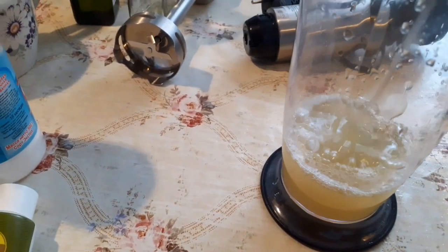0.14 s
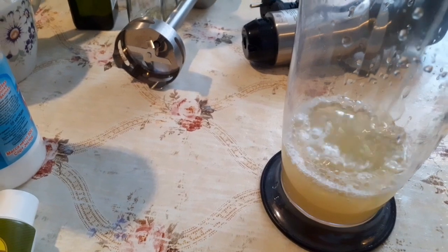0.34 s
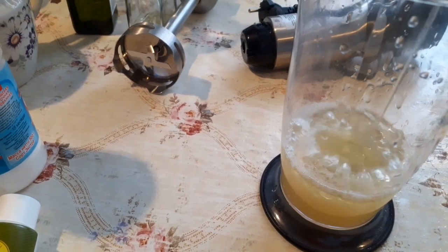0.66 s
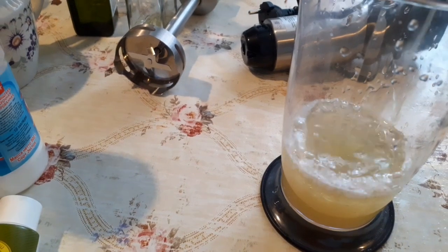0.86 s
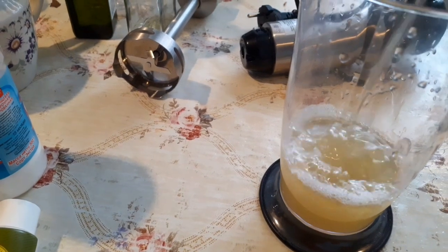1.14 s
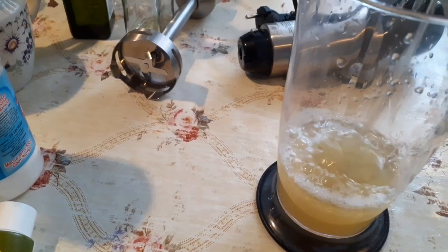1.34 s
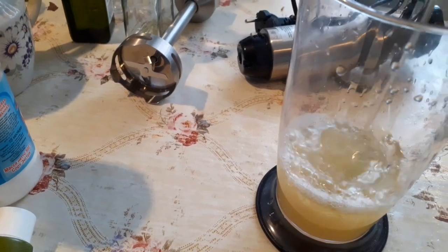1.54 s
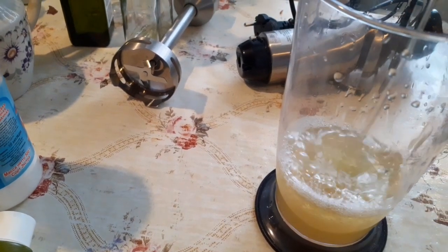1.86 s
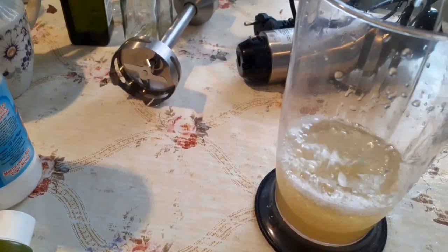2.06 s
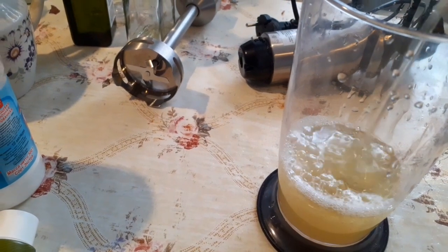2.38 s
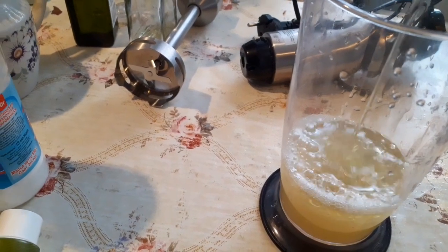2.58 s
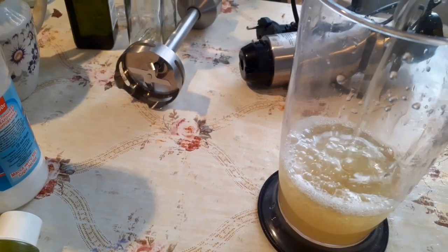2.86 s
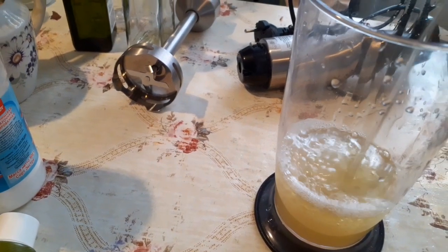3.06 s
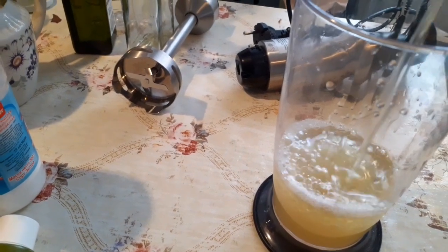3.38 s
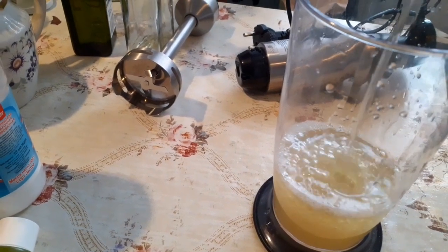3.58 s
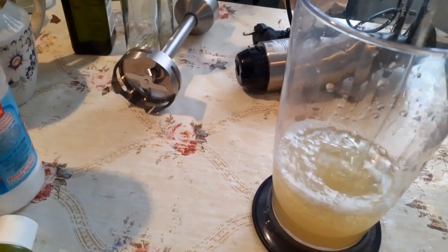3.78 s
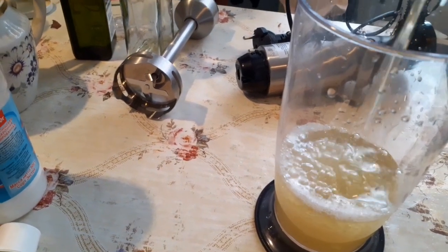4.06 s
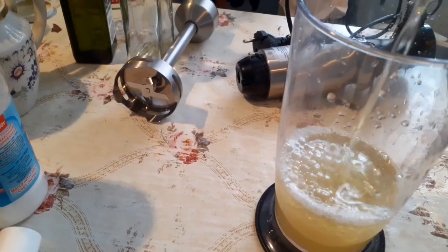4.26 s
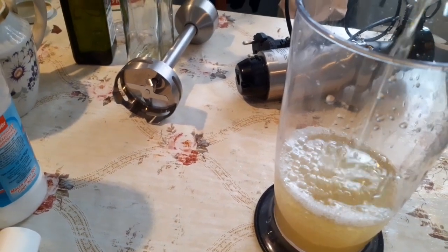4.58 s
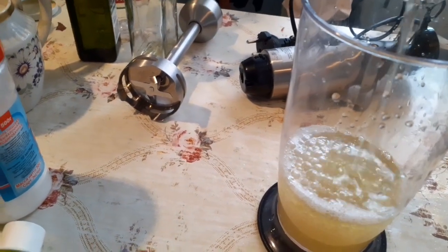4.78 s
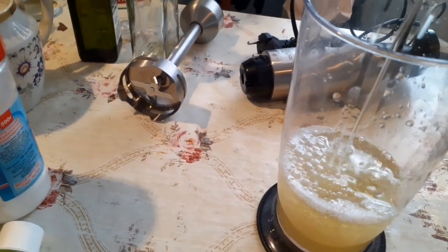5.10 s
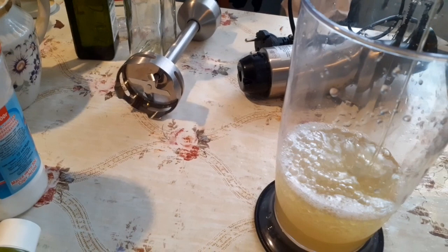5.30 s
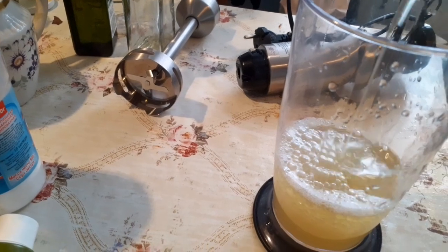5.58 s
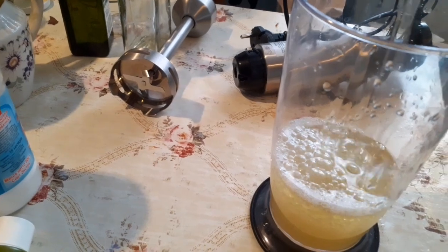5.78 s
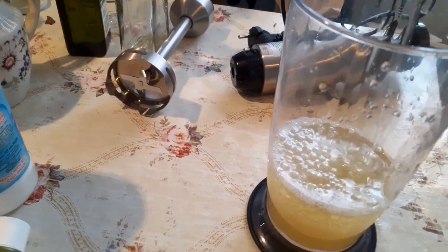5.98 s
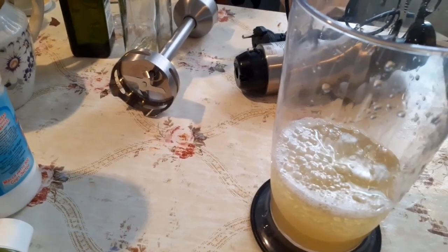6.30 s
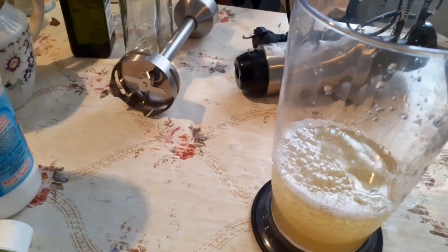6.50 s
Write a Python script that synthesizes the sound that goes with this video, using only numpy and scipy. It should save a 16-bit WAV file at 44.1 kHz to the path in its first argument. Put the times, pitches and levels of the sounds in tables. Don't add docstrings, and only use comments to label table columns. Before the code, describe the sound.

Oil glugs quickly from a bottle into a tall plastic beaker, hollow thumps and splashes thinning into scattered bubble plinks over a faint kitchen hum.

```python
import sys
import numpy as np
from scipy import signal
from scipy.fft import rfft, irfft, next_fast_len
from scipy.io import wavfile
from scipy.ndimage import uniform_filter1d

SR = 44100
rng = np.random.default_rng(int(sys.argv[2]) if len(sys.argv) > 2 else 0)


def bounce(signal):
    frames = np.transpose(np.atleast_2d(signal))
    limited = np.clip(frames, -1, 1)
    pcm = np.round(limited * 32767).astype(np.int16)
    wavfile.write(sys.argv[1], SR, pcm)


def elevation(decibels):
    levels = np.asarray(decibels, float)
    return 10 ** (levels / 20)


N = 292824
TIME_S = np.arange(N) / SR
NEAR_DB = 6


def colour(x, points):
    hz, db = np.transpose(points)
    size = next_fast_len(len(x))
    bin_hz = np.arange(size // 2 + 1) * SR / size + 1
    gain = elevation(np.interp(np.log(bin_hz), np.log(hz), db))
    return irfft(rfft(x, size) * gain, size)[:len(x)]


def level(x, db):
    return x * elevation(db) / np.sqrt(np.mean(x ** 2))


def noise(points, db):
    return level(colour(rng.standard_normal(N), points), db)


def walk(rate_hz):
    hold = int(SR / rate_hz)
    steps = np.repeat(rng.standard_normal(N // hold + 1), hold)
    return 0.91 * uniform_filter1d(steps, hold)[:N]


def add(out, s, grain):
    i = int(s * SR)
    out[i:i + len(grain)] += grain[:N - i]


def ring(hz, db, t60_s, rise_s, glide=0.):
    t = np.arange(int(t60_s * SR)) / SR
    envelope = elevation(db - 60 * t / t60_s) * (1 - np.exp(-t / rise_s))
    return envelope * np.sin(2 * np.pi * hz * t * (1 + glide * t / t60_s))


def swarm(out, s, hz, db, count, spread, within_s, cycles):
    for detune, lag, size in rng.standard_normal((count, 3)):
        f = np.clip(hz * np.exp(spread * detune), 500, 15000)
        size_db = db + 2.2 * size - 4 * lag ** 2
        add(out, s + within_s * lag ** 2, ring(f, size_db, cycles / f, 2 / f, glide=0.14))


# (frequency [Hz], t60 [s], level [dB])
ROOM = [(153, 0.68, -37), (349, 0.52, -3), (620, 0.23, -0.5), (1000, 0.2, 0), (1850, 0.18, -1),
        (5340, 0.22, -4.5), (12900, 0.17, 0.5)]


def kitchen(x):
    places, shifts_hz = 3, 11
    hz, t60_s, db = np.transpose(ROOM)
    t, tails = TIME_S[:SR // 2], 0
    for centre in 60 * 2 ** np.arange(0, 8.1, .5):
        at = np.log(centre), np.log(hz)
        bandpass = [(centre / 2, -60), (centre / 2 ** .5, -15), (centre, 0),
                    (centre * 2 ** .5, -15), (centre * 2, -60)]
        band = colour(rng.standard_normal(places * len(t)), bandpass).reshape(places, -1)
        fade = elevation(-60 * t / np.interp(*at, t60_s)) * (t > .004)
        tails = tails + band * fade * elevation(np.interp(*at, db)) / np.sqrt(np.sum(fade ** 2))
    share = np.array([walk(shifts_hz) for _ in range(places)])
    share /= np.sqrt(np.sum(share ** 2, axis=0))
    return x + signal.oaconvolve(x * share, tails, axes=1).sum(axis=0)[:N]


# (time [s], level [dB])
CHURN = [(0, -58), (1.1, -46), (2.75, -48.5), (2.9, -42), (3.25, -51.5), (4, -47.5), (4.3, -54),
         (4.7, -41.5), (5.24, -50.5), (5.31, -48.5), (5.4, -55.5), (5.95, -46), (6.07, -50.5), (6.19, -46),
         (6.3, -48.5), (6.52, -62), (6.58, -44.5), (6.64, -46.5)]
# (frequency [Hz], density [dB per Hz])
RUMBLE = [(24, -54), (40, -55), (123, -7), (157, -12.5), (179, -0.5), (216, -5), (235, -1.5), (341, 1),
          (558, -31), (700, -89)]


def rumble():
    lumps = elevation(2.84 * walk(30)) * rng.standard_normal(N)
    churn_db = np.interp(TIME_S, *np.transpose(CHURN))
    return level(colour(lumps, RUMBLE), 0) * elevation(churn_db)


# (time [s], level [dB])
FOAM = [(0, -66.5), (1.2, -60.5), (2.2, -66.5), (2.6, -60), (2.95, -58.5), (3.2, -64.5), (3.6, -56.5),
        (4.25, -65), (4.6, -56), (4.8, -66), (5.0, -53.5), (5.25, -66), (5.8, -68), (6.64, -71.5)]
# (frequency [Hz], level [dB])
FIZZ = [(400, -9), (600, 0.5), (900, 1), (1300, -4), (1750, 12), (2600, 2), (4500, 7), (9000, 2.5),
        (16000, 1.5)]


def fizz():
    chatter = 0.19 * rng.standard_normal(N)
    for when, pitch, size in rng.random((2600, 3)):
        hz = 450 * 12 ** pitch
        add(chatter, when * N / SR, ring(hz, 11 * size ** 3, 22 / hz, 0.0011, glide=0.17))
    foam_db = np.interp(TIME_S, *np.transpose(FOAM))
    return level(colour(chatter, FIZZ), 0) * elevation(foam_db)


# (time [s], thump [dB], bubble [Hz], bubble re thump [dB], deep modes re thump [dB])
GULPS = [(0.001, -27.5, 860, -42, -0.5), (0.177, -18, 578, -1, -1), (0.358, -27, 710, -14, 0.5),
         (0.532, -22.5, 680, -1.5, 2), (0.703, -28.5, 734, -7.5, 4.5), (0.878, -19.5, 597.4, 5, -2.5),
         (1.055, -29.5, 694, -7, -9), (1.224, -26.5, 806, -6, -3), (1.4, -25, 754, -10.5, -1.5),
         (1.564, -27, 616, -6, 4), (1.734, -19.5, 639, -3.5, -4.5), (1.904, -19.5, 639, 0.5, -8),
         (2.076, -14, 540, -0.5, 0), (2.245, -29, 612, 3.5, 3), (2.42, -26.5, 670, -3, 0),
         (2.598, -34.5, 642, 7.5, 13.5), (2.777, -25.5, 610, -1, -2), (2.964, -40.5, 695, 5, 1),
         (3.127, -27.5, 533, 1.5, 0), (3.3, -34.5, 545, 3.5, 3.5), (3.48, -28.5, 622, 1, -6.5),
         (3.652, -34.5, 645, 6, -3.5), (3.826, -24, 759, -3, -1.5), (4.001, -26.5, 650, -0.5, 1),
         (4.174, -29.5, 735, 4, -1), (4.355, -35.5, 827, -9.5, -9), (4.53, -42, 563, -25, 7.5),
         (4.856, -34, 836, -10, -3)]
# (frequency [Hz], level [dB], t60 [s])
BODY = [(109, -11.5, 0.3), (141.7, -2.5, 0.33), (198.2, -0.5, 0.3), (251.8, 4.5, 0.27), (309.7, 2.5, 0.17),
        (335, -0.5, 0.14), (361, -27, 0.2)]
# (frequency [Hz], level re thump [dB], t60 [s])
NECK = [(1152.5, -16, 0.13), (836, -20, 0.2)]
NECK_RINGS_DB = [0, 0.5, -6, -2.5, -4, -3, -3, 5, 4, -1.5, 8, 8.5, 1.5, -7, 5, -3.5]


def gulps():
    out = np.zeros(N)
    necks_db = NECK_RINGS_DB + NECK_RINGS_DB[-1:] * len(GULPS)
    for (s, db, hz, bubble_re_db, deep_db), neck_db in zip(GULPS, necks_db):
        s += .002
        for f, mode_db, t60_s in BODY:
            size, detune = rng.standard_normal(2)
            mode_db = db + mode_db - 7 + 2 * size + (f < 170) * deep_db
            add(out, s, ring(f * (1 + 0.036 * detune), mode_db, 0.91 * t60_s, 0.0021))
        add(out, s, ring(371, db - 3, 0.02, 0.00053))
        bubble_db = db + bubble_re_db
        add(out, s, ring(hz, bubble_db, 0.089, 0.00059, glide=0.051))
        pair_hz = hz * (1 + 0.1 * np.tanh(rng.standard_normal()))
        add(out, s, ring(pair_hz, bubble_db - 5, 0.076, 0.006, glide=-0.054))
        for f, mode_db, t60_s in NECK:
            size, detune = rng.standard_normal(2)
            mode_db = db + mode_db + neck_db + 0.87 * size - 3.5 * s
            add(out, s, ring(f * (1 + 0.0193 * detune), mode_db, t60_s, 0.00015, glide=0.013))
        swarm(out, s, hz, bubble_db - 13, count=4, spread=.3, within_s=.012, cycles=14)
    return out


# (time [s], spray [dB], spray [Hz], top re spray [dB], slap [dB])
SPLASHES = [(0.002, -33, 5450, -5, -28), (0.176, -52, 7600, 14.5, -31.5), (0.357, -38.5, 4310, -9, -34),
            (0.5345, -41.5, 6700, 1, -30.5), (0.7081, -39.5, 4560, -6, -27.5),
            (0.878, -41, 6500, -33, -24.5), (1.057, -28.5, 6120, -7.5, -32.5),
            (1.2268, -29.5, 5580, -13, -25.5), (1.4, -27.5, 6340, -5.5, -22),
            (1.567, -22.5, 6540, -7.5, -27), (1.7387, -39, 4700, 1, -18.5), (1.907, -27.5, 7180, -6, -19),
            (2.0778, -31, 6770, -1.5, -26.5), (2.2474, -39.5, 4440, 1, -30),
            (2.425, -34.5, 7800, -8, -29.5), (2.601, -34, 7640, 0, -26.5), (3.303, -53, 7200, -23, -36),
            (3.669, -23.5, 5620, -12, -29), (3.829, -41, 6500, -16, -45), (4.0078, -46, 6960, -15, -36),
            (4.1728, -47, 6660, -2, -34.5), (4.358, -48, 7160, -20, -37.5), (4.532, -35, 5260, -5, -45),
            (4.863, -31, 6200, -22, -32.5)]


def slaps():
    out, t = np.zeros(N), TIME_S[:6000]
    for s, *_, db in SPLASHES:
        add(out, s, elevation(db - 60 * t / 0.16) * (1 - np.exp(-t / 0.00093)))
    return out * noise([(600, 13), (900, 15), (2000, 6.5), (3500, 5.5), (16000, -13.5)], -14)


def drops():
    out = np.zeros(N)
    for s, *_, slap_db in SPLASHES:
        swarm(out, s, 3110, slap_db + 1, count=20, spread=0.59, within_s=0.029, cycles=8.1)
    return out


def high_air():
    return noise([(6000, -39), (9000, -16), (11000, -5.5), (13000, 2), (16000, -1.5)], 0.55)


# (time [s], level [dB], frequency [Hz], top re peak [dB])
BURSTS = [(0.013, -37.5, 6200, 4), (0.4955, -44, 6700, -58), (0.739, -44, 4400, -25),
          (0.991, -35.5, 6230, -33), (1.163, -40.5, 5740, -35), (2.32, -47, 4250, -26),
          (2.3788, -42, 5340, -29), (2.715, -35.5, 6120, -12), (2.7796, -47, 6900, -9),
          (2.819, -46.5, 4350, -6), (3.025, -37.5, 4380, -13), (3.3535, -39, 5220, -9),
          (3.4158, -43.5, 6500, -11), (3.479, -38, 3930, -16), (3.5643, -43.5, 4440, -25),
          (3.8475, -28, 4900, -13), (3.931, -43.5, 6700, -25), (4.031, -33, 5920, -14),
          (4.127, -40, 6200, -1), (4.4357, -41.5, 8120, -3), (4.4856, -31, 6400, -8),
          (4.6204, -34, 5570, -10), (4.802, -42, 6100, -5), (4.9377, -41, 5340, -10),
          (4.968, -39.5, 6400, -6), (5.1397, -35.5, 5440, -6), (5.3004, -44.5, 3950, -20),
          (5.469, -37, 5700, -49), (5.9089, -41.5, 5840, -4)]
# (time [s], level [dB], frequency [Hz], top re peak [dB])
SPITS = [(2.426, -31.5, 11300, -20), (2.44, -40, 11000, -20), (2.615, -45, 13500, -10),
         (2.852, -48, 6800, -12), (3.612, -53, 6100, -13), (4.352, -55, 5200, -20), (4.685, -53, 5300, -20),
         (4.855, -37.5, 4770, -17), (4.928, -44, 5500, -20), (5.056, -49, 5200, -15),
         (5.15, -48, 4900, -25), (5.175, -41, 4270, -25), (3.869, -43, 3100, -23), (1.75, -34, 2440, -30)]


def bursts():
    out, puffs = np.zeros(N), np.zeros(N)
    t = TIME_S[:6000]
    puff = np.minimum(t / .001, 1) * (elevation(-60 * t / .009) + elevation(-22 - 60 * t / .13))
    sprays = [row[:4] for row in SPLASHES]
    for s, db, hz, top_db in BURSTS + sprays + SPITS:
        add(out, s, ring(hz, db - 5, .006, .0005))
        swarm(out, s, hz, db - 1.5, count=24, spread=0.14, within_s=0.0043, cycles=42.6)
        add(puffs, s, elevation(db + top_db) * puff)
    return out + puffs * high_air()


# (time [s], level [dB], frequency [Hz])
BUBBLES = [(0.0133, -20, 1500), (0.3632, -25, 1500), (0.546, -27, 1090), (0.7035, -36, 1370),
           (0.7124, -15, 1588), (0.917, -33, 1140), (1.244, -40, 1240), (2.5055, -16, 1606),
           (2.551, -26, 1460), (2.603, -29.5, 1214), (2.646, -32, 1036), (3.6499, -31, 1000),
           (3.668, -26.5, 642), (3.69, -32, 933), (4.025, -23, 645), (3.8262, -23.5, 966),
           (3.9009, -23.5, 1500), (4.001, -32, 1510), (4.0302, -13.5, 1500), (4.0327, -21, 1750),
           (4.1762, -21.5, 1530), (4.3582, -29.5, 1110), (4.6057, -18.5, 1636), (4.6387, -32, 1390),
           (4.682, -19.5, 1474), (4.865, -34.5, 1350), (4.968, -16.5, 1578), (5.013, -32, 740),
           (5.055, -43, 718), (5.338, -28, 1515), (5.486, -40, 900),
           (1.0803, -32.5, 1680), (1.1586, -32, 2470), (1.226, -25.5, 1730), (1.615, -32, 1770),
          (1.616, -29.5, 2390), (2.322, -19, 2080), (2.399, -38, 1525), (2.603, -26, 2480),
          (2.6498, -19.5, 2415), (3.137, -23, 2104), (3.324, -19.5, 1703), (3.3507, -38, 2300),
          (3.3525, -8.5, 2210), (3.485, -15, 1940), (3.5266, -23, 1856), (3.528, -29.5, 2350),
          (3.6694, -21, 2170), (3.691, -13.5, 2120), (3.744, -27, 1700), (3.8294, -23.5, 2213),
          (3.8468, -21, 1720), (4.087, -35, 2420), (4.1082, -27.5, 1650), (4.5841, -25, 1760),
          (4.745, -36.5, 2430), (4.9674, -26.5, 2480), (5.1362, -27.5, 2150), (5.298, -35, 2420),
          (5.7053, -32.5, 1820), (5.7198, -27, 1924),
           (0.014, -15, 3030), (0.5915, -34, 3450), (0.7088, -28, 3870), (0.7275, -26.5, 2920),
         (0.981, -39, 3030), (0.9904, -37.5, 3670), (1.229, -21, 3440), (1.926, -31, 3050),
         (2.3438, -27, 2950), (2.378, -27.5, 3210), (2.5502, -30.5, 2600), (2.7103, -26, 3040),
         (2.738, -23, 2920), (2.782, -24, 2850), (3.0253, -28, 3370), (3.07, -32.5, 3660),
         (3.318, -18, 3140), (3.482, -30, 4080), (4.029, -34, 3390), (4.129, -34.5, 3200),
         (4.292, -37.5, 3050), (4.605, -35, 3460), (4.6203, -14, 3335), (4.8637, -21.5, 3144),
         (4.9376, -24, 3410), (5.1323, -15, 3800), (5.47, -38.5, 4150), (5.687, -38, 3120),
         (5.913, -36.5, 4010), (6.015, -39.5, 3110), (6.107, -41.5, 3440),
           (0.149, -44, 4180), (.238, -45, 2870), (.312, -49, 4200), (0.478, -44, 3320), (0.593, -30.5, 2620),
        (0.591, -32, 3910), (0.837, -47, 4830), (1.242, -26.5, 1960), (1.332, -39.5, 2700),
        (1.421, -30.5, 3380), (2.277, -39, 2450), (2.323, -28.5, 2510), (2.325, -28, 1760),
        (2.399, -31, 2410), (2.496, -37, 2990), (2.553, -47, 2960), (2.651, -33, 1330), (2.651, -32, 1780),
        (2.79, -33.5, 1080), (2.945, -37.5, 1098), (2.982, -32, 1670), (3.05, -34.5, 2190),
        (3.238, -40.5, 2200), (3.692, -19.5, 1716), (3.746, -40, 2050), (4.112, -46, 2000),
        (4.439, -42, 1900), (4.485, -41, 2190), (4.534, -41.5, 1170), (4.54, -38, 1630), (4.569, -31, 1540),
        (4.626, -24.5, 2300), (4.648, -38, 3260), (4.868, -30, 2090), (4.941, -31, 2470),
        (5.057, -40.5, 1000), (5.136, -37.5, 814), (5.369, -43, 1500), (5.618, -47.5, 4000),
        (5.71, -47, 1193), (5.745, -39, 1850), (5.775, -36, 1850), (5.823, -41, 2000), (5.91, -40.5, 2570),
        (6.016, -46, 2520), (6.04, -47, 1970)]


def plinks():
    out = np.zeros(N)
    trapped = [(s, slap_db - 8, 2850 * np.exp(0.082 * rng.standard_normal()))
               for s, *_, slap_db in SPLASHES]
    for s, db, hz in trapped + BUBBLES:
        if hz < 2230:
            add(out, s, ring(hz, db - 4.5, 48 / hz, 0.0011, glide=0.011))
            pair_hz = hz * (1 + 0.074 * np.tanh(3 * rng.standard_normal()))
            add(out, s, ring(pair_hz, db - 13.5, 40 / hz, 0.0026))
            swarm(out, s, hz, db - 11, count=7, spread=.055, within_s=.016, cycles=30)
        else:
            add(out, s, ring(hz, db - 1.5, 0.02, 0.001, glide=0.016))
            swarm(out, s, hz, db - 13, count=9, spread=.06, within_s=.008, cycles=30)
    return out


# (time [s], level [dB], frequency [Hz])
GURGLES = [(0.005, -35, 1760), (0.36, -45, 1820), (3.14, -44, 1890), (3.34, -37, 1640), (3.49, -36, 1810),
           (3.54, -39.5, 2100), (3.7, -35.5, 1770), (3.829, -36, 1400), (4.041, -33, 1850),
           (4.18, -37, 1200), (4.19, -42, 1700), (4.358, -41.5, 1520), (4.599, -41, 3000), (4.87, -47, 960),
           (4.97, -39, 2980), (5.14, -37.5, 2350)]


def gurgles():
    out = np.zeros(N)
    for s, db, hz in GURGLES:
        swarm(out, s, hz, db, count=24, spread=0.096, within_s=0.032, cycles=20.5)
    return out


# (time [s], start [Hz], end [Hz], length [s], level [dB], levelling off [exponent])
SQUEAKS = [(0.533, 1272, 2330, 0.025, -36.5, 1.2), (0.71, 1502, 4770, 0.032, -31, 1),
           (1.068, 1184, 1790, 0.024, -39.5, 3.1), (1.077, 2450, 3130, 0.025, -46, 1.8),
           (1.234, 940, 1520, 0.02, -34.5, 1), (1.24, 1090, 2406, 0.048, -40, 2.63),
           (2.102, 1174, 1920, 0.034, -44, 1.05), (2.358, 2650, 3650, 0.0064, -50, 1.1),
           (2.397, 1460, 1805, 0.027, -38, 2.05), (2.42, 1567, 3460, 0.018, -32, 2.3),
           (3.244, 610, 1410, 0.05, -44.5, 0.51), (3.637, 940, 3900, 0.027, -42.5, 2.1),
           (2.274, 702, 1500, 0.049, -53, 1.04), (0.902, 1920, 3220, 0.0125, -41.5, 1.2),
           (3.774, 757, 1850, 0.031, -48, 0.89), (3.066, 2770, 4170, 0.01, -41, 1.2)]


def squeaks():
    out = np.zeros(N)
    for s, start_hz, end_hz, length_s, db, levelling in SQUEAKS:
        u = np.arange(int(length_s * SR)) / (length_s * SR)
        rise = 1 - (1 - u ** 1.9) ** levelling
        phase = 2 * np.pi * np.cumsum(start_hz + (end_hz - start_hz) * rise) / SR
        add(out, s, elevation(db - 6.9 * u) * np.sin(np.pi * u) ** 0.15 * np.sin(phase))
    return out


# (time [s], left [dB], right [dB], frequency [Hz], t60 [s])
BUMPS = [
    (1.093, -55, -42, 112, 0.098),
    (2.09, -50, -48, 119, .12),
    (3.673, -24, -58, 102, 0.096),
    (3.824, -50, -34, 127, .1),
    (5.477, -28.5, -67, 108.8, 0.38),
    (5.49, -33, -63, 130, 0.16),
]


def bumps(right):
    out = np.zeros(N)
    for s, left_db, right_db, hz, t60_s in BUMPS:
        if right:
            add(out, s, ring(hz, right_db, t60_s, .006))
        else:
            add(out, s, ring(hz, left_db - NEAR_DB, t60_s, .018))
    return out


# (time [s], level [dB])
SNAPS = [(2.4243, -35), (2.602, -21), (2.7099, -51), (2.722, -42), (2.7792, -50), (2.8207, -48),
         (2.9045, -53), (3.0254, -55), (3.0528, -42), (3.322, -55), (3.352, -42), (3.424, -51),
         (3.4831, -48), (3.6092, -40), (3.6503, -50), (3.667, -31), (3.8283, -48), (3.8494, -39.5),
         (3.929, -49), (4.006, -53), (4.0299, -43), (4.0938, -39), (4.128, -46), (4.176, -41), (4.358, -50),
         (4.436, -34), (4.484, -37), (4.5313, -32), (4.58, -38), (4.6048, -37), (4.8016, -53), (4.863, -41),
         (4.9373, -47), (4.967, -44), (5.0411, -56), (5.133, -34.5), (5.186, -45), (5.6233, -48),
         (5.6856, -50), (5.9086, -49)]


def snaps():
    out = np.zeros(N)
    for s, db in SNAPS:
        add(out, s, elevation(db - 3 - 60 * TIME_S[:2000] / 0.011))
    return out * high_air()


# (frequency [Hz], gain [dB])
MICROPHONE = [(25, -16), (60, -13), (100, -0.5)]
# (frequency [Hz], density [dB per Hz])
HISS_LEFT = [(30, -16), (100, 12.5), (200, -18), (330, 14.5), (500, -4), (1500, -3.5), (3000, -9),
             (6000, -13), (7500, -2.5), (9000, -20.5), (16000, -9.5)]


def left_microphone(pour):
    return colour(pour, MICROPHONE) + noise(HISS_LEFT, -55.5)


# (frequency [Hz], gain [dB])
LEAK = [(30, -50), (60, -25), (150, -31.5), (300, -34.5), (600, -40), (1200, -75), (4000, -78),
        (15000, -62)]
# (frequency [Hz], density [dB per Hz])
HISS_RIGHT = [(30, -10), (60, -3), (100, 0.5), (200, -7), (330, 0.5), (500, -11), (1500, -17.5),
              (3000, -18), (7500, -23), (8500, -19.5), (16000, -18.5)]


def right_microphone(pour):
    late = np.roll(pour, 15)
    return colour(late, LEAK) + noise(HISS_RIGHT, -58) + bumps(right=True)


def scene():
    slosh = elevation(2.5 * walk(55))
    thumps = (gulps() + bumps(right=False)) * slosh
    oil = slaps() + drops() + bursts() + plinks() + gurgles() + squeaks() + snaps()
    pour = elevation(NEAR_DB) * (kitchen(thumps + oil) + rumble() + kitchen(fizz()))
    return np.array([left_microphone(pour), right_microphone(pour)])


def top_cut(x):
    return signal.sosfilt(signal.butter(12, 16660, fs=SR, output="sos"), x)


# (frequency [Hz], gain [dB])
PASSBAND = [(20, -5), (45, 0), (15650, 0), (15850, -42), (16600, -48), (16700, -80)]


def record(dry):
    mix = np.array([colour(x, PASSBAND) for x in dry])
    return top_cut(mix)


dry = scene()
out = record(dry)
bounce(out)
```